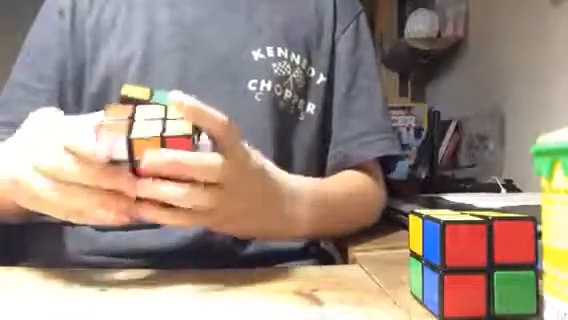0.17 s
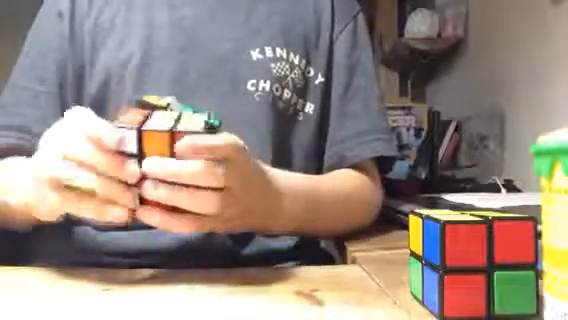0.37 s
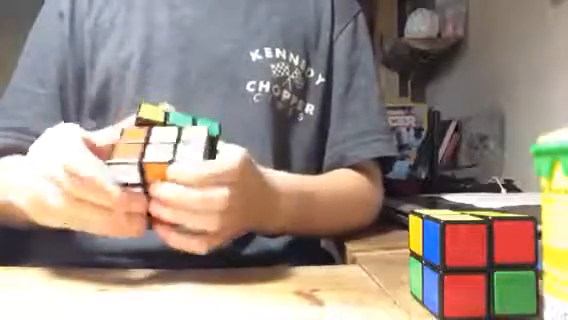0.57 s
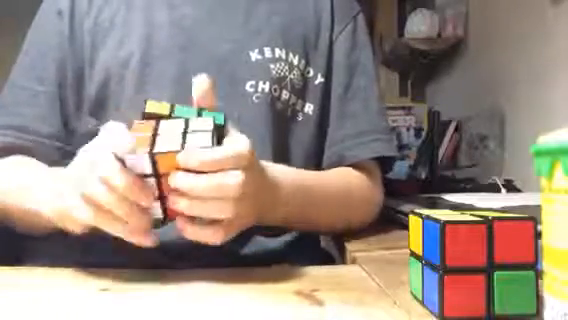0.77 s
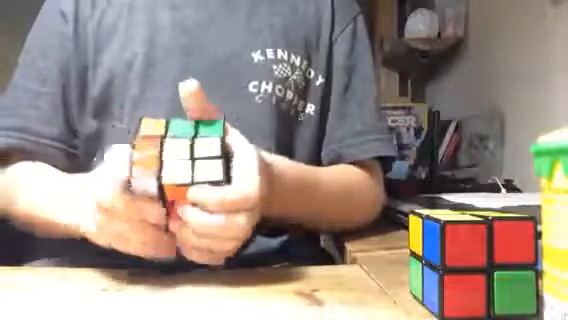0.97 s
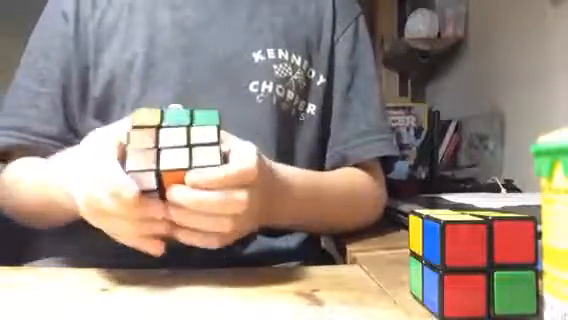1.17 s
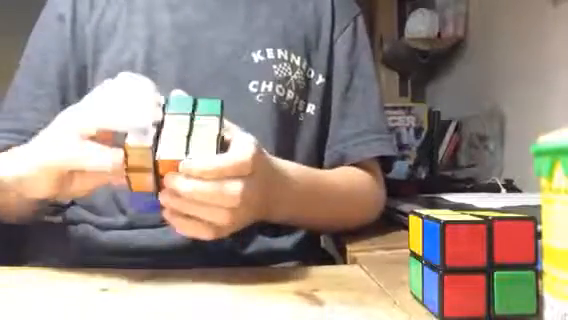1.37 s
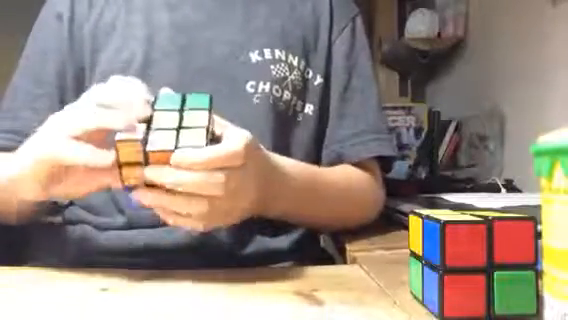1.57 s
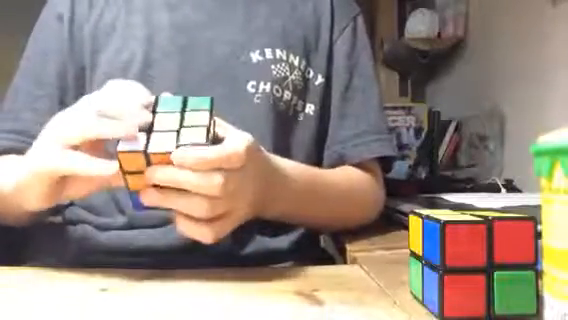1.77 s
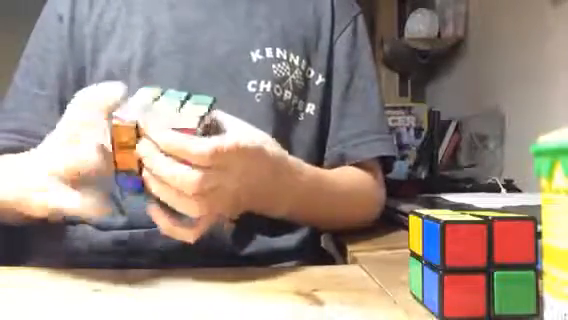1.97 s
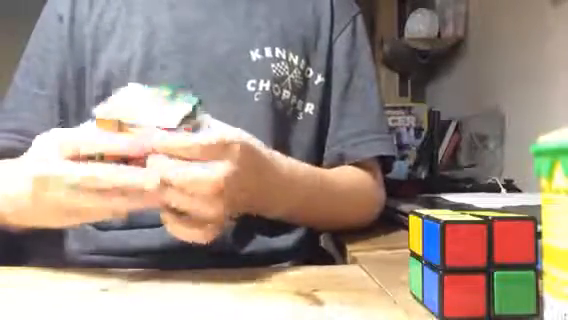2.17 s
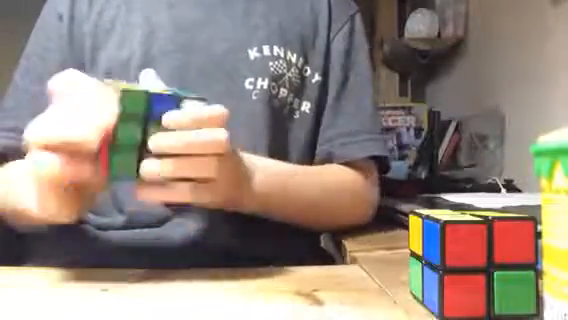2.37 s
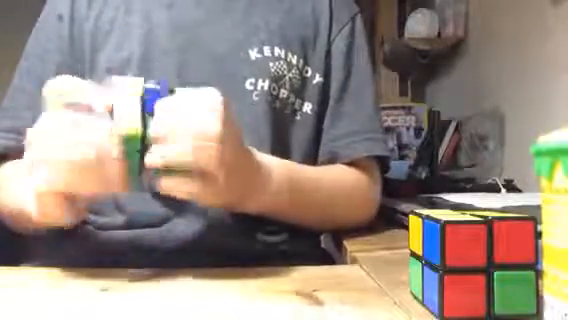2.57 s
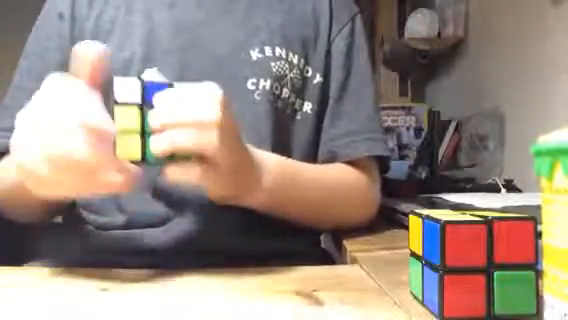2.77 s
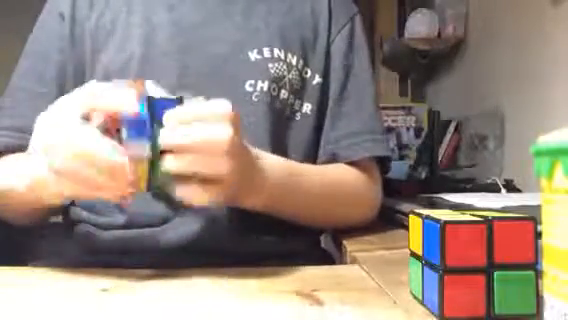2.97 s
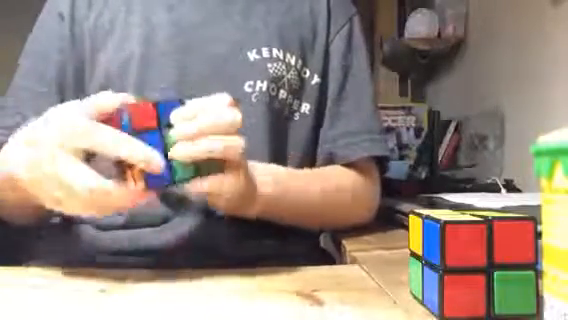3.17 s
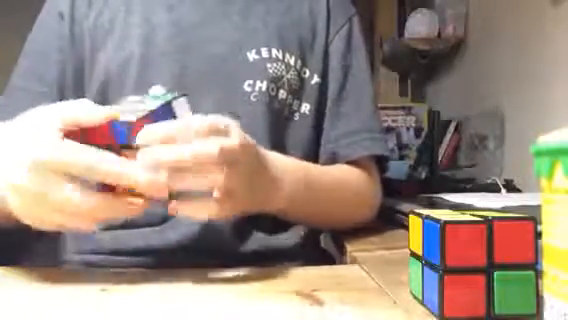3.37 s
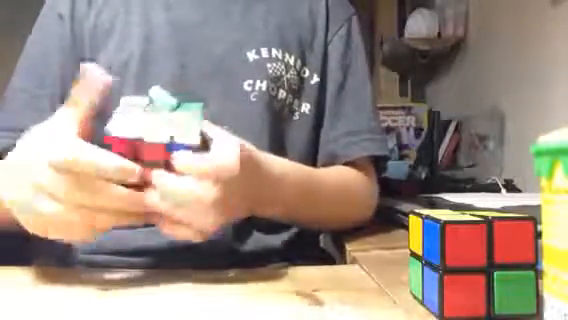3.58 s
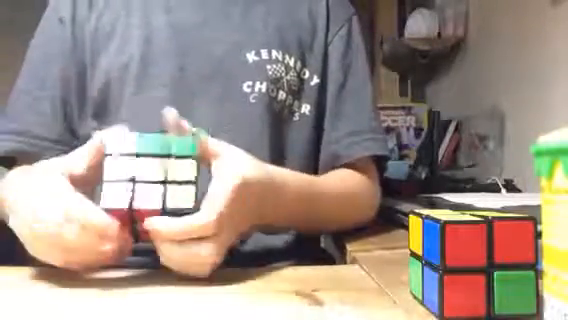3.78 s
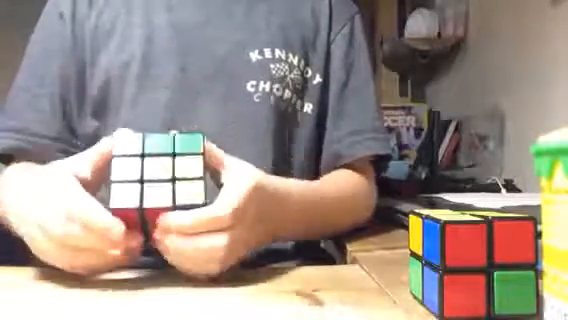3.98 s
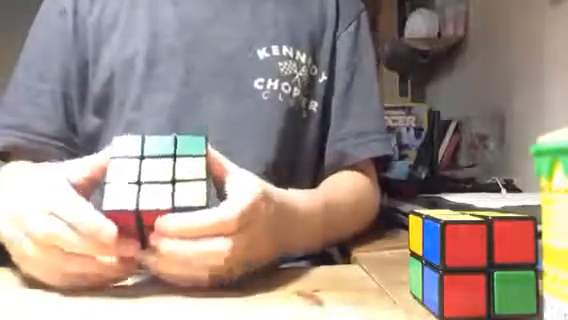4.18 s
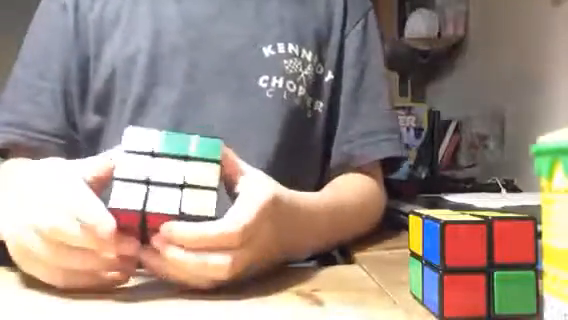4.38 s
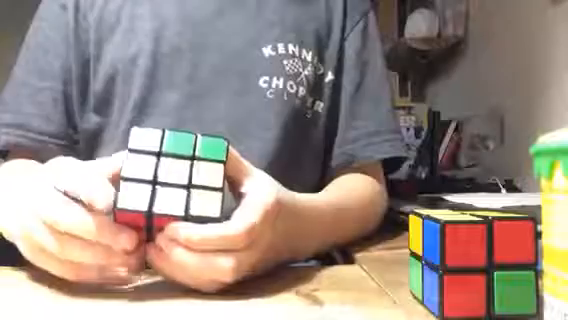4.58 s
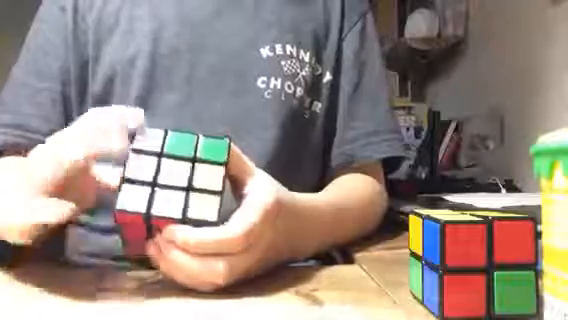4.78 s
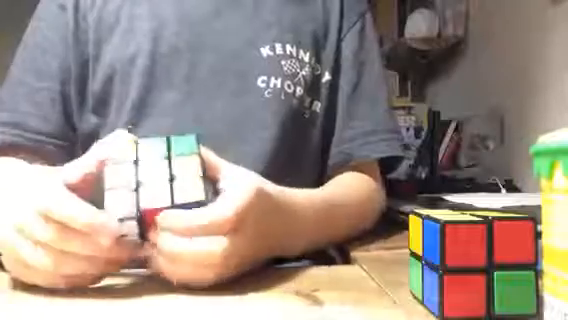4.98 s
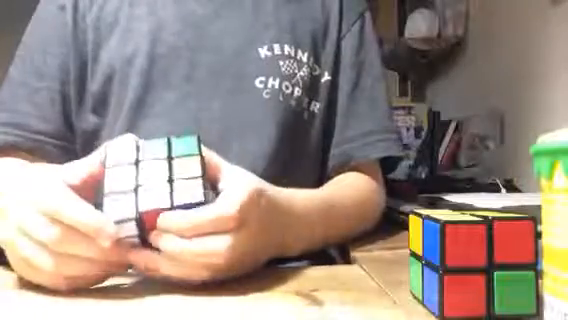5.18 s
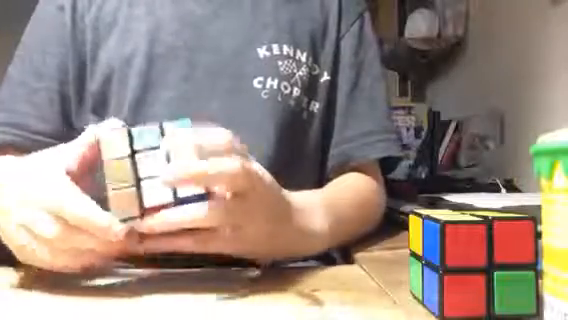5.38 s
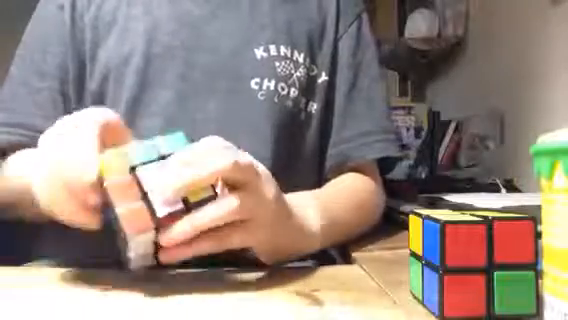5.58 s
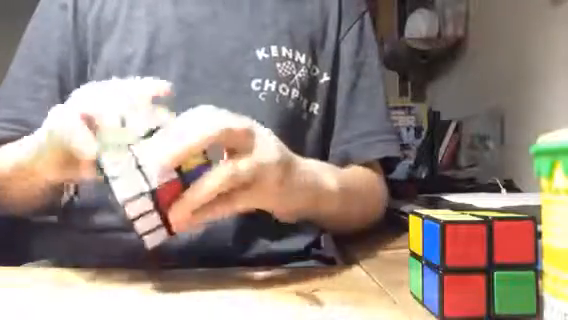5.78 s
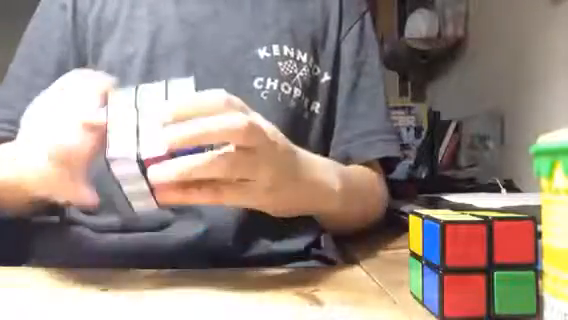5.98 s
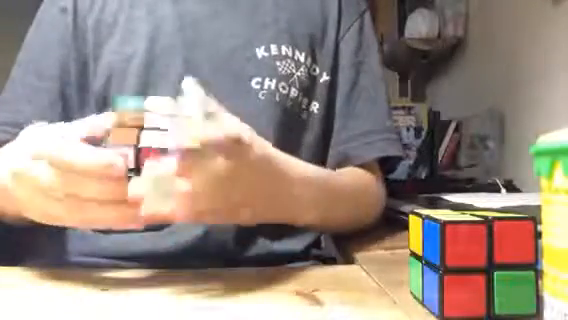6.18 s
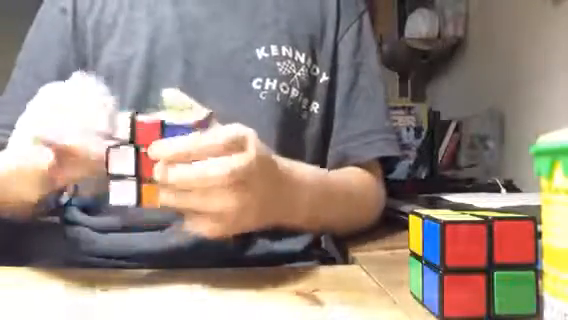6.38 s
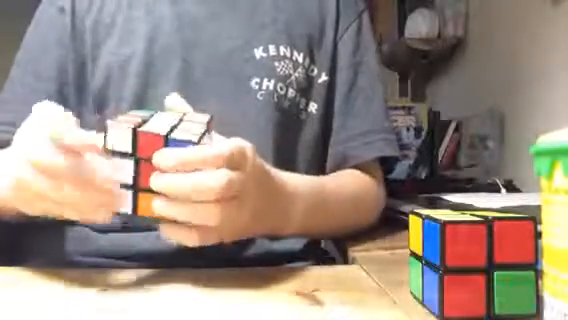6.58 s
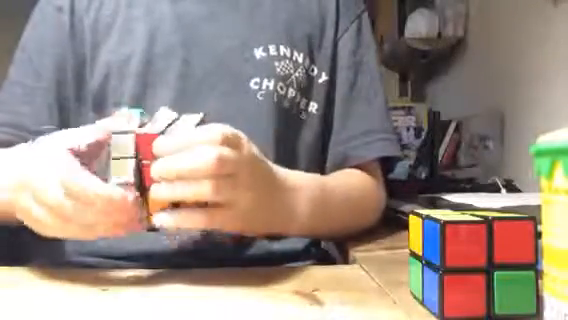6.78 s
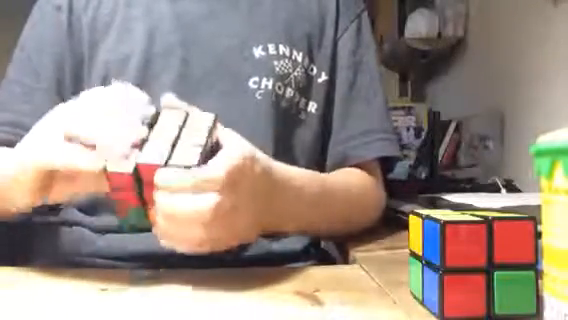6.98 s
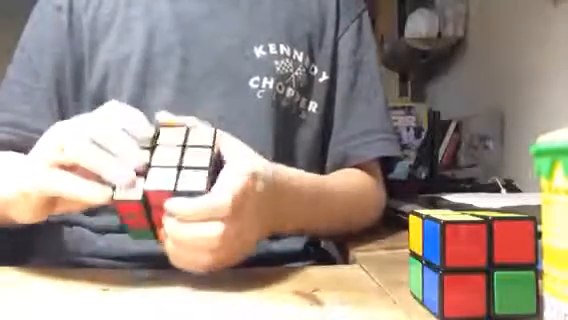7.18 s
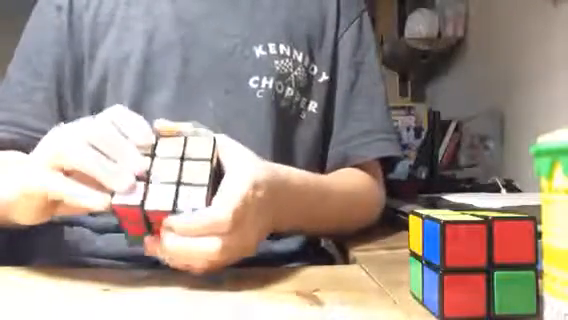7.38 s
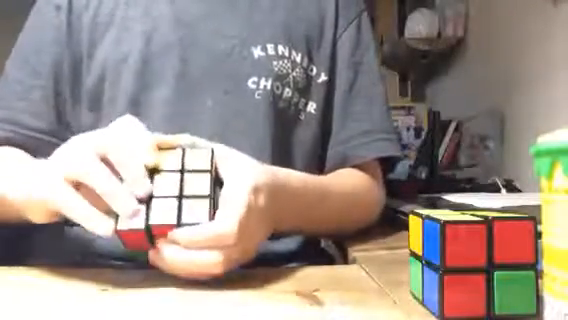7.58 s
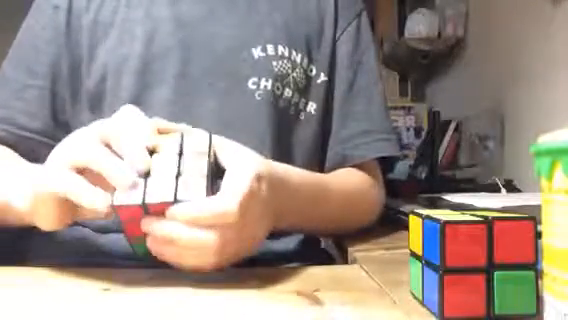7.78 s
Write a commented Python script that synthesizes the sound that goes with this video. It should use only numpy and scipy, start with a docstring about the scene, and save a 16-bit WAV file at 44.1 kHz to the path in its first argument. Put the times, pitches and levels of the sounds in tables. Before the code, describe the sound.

Close, dry, short plastic clacks with bright ticking edges and tiny rattles, made by layers of a twisted puzzle cube catching and snapping home. They arrive in irregular tight bursts with gaps between, including one long quiet hold in the middle with barely audible finger touches. The last stretch is denser, then eases to soft clicks. A small room adds slight reflections over soft rumble and hiss.

```python
"""A plastic puzzle cube is twisted in the hands, close to a phone microphone.
Each time the pieces catch or snap home they knock: short dying tones ring low for the hollow cube
and higher for the pieces, and bright pings and noise bursts tick for the edges. Tiny random contacts
chatter around each knock. Faces rustle in grains of noise and fingertips make short noise puffs.
A quiet room adds reflections, with steady rumble, hiss, hum and a faint whine behind."""
import sys
import numpy as np
from scipy import signal
from scipy.fft import rfft, irfft, next_fast_len
from scipy.io import wavfile
from scipy.ndimage import uniform_filter1d

SR = 44100
rng = np.random.default_rng(int(sys.argv[2]) if len(sys.argv) > 2 else 0)


def waveform_to_disk(signal):
    """Save audio, clipped to [-1, 1], as 16-bit WAV at the path in sys.argv[1]."""
    frames = np.transpose(np.atleast_2d(signal))
    scaled = np.clip(frames, -1, 1) * 32767
    samples = np.round(scaled).astype(np.int16)
    wavfile.write(sys.argv[1], SR, samples)


N = 346185  # length of the scene in samples

# Moments when the pieces catch or snap home: (time [s], cube ring level [dB], favoured cube pitch [Hz],
# piece ring over cube [dB], favoured piece pitch [Hz], tick over cube [dB])
KNOCKS = [(0.0547, -42.5, 1324, -14.5, 2710, -18), (0.146, -57, 1150, -7, 3030, -7),
          (0.187, -52, 1000, -4.5, 3040, -4), (0.24, -63.5, 1550.0, -2, 2400.0, 3.0),
          (0.274, -64.5, 1500, 4, 2820, 1), (0.435, -37, 1286, -11, 3050, -8.5),
          (0.6155, -54.5, 1200.0, -7, 3500, -13.5), (0.662, -29, 1300, -13.0, 2720.0, -16),
          (0.6856, -50, 1060.0, -15, 2490.0, -7), (0.7568, -47.5, 970, -11, 3440, -17.0),
          (0.7755, -44.5, 1880, -1.5, 3400.0, -11), (0.8664, -35.5, 1200.0, -0.5, 3460, -11.5),
          (0.8915, -43.5, 1010, -18.0, 3410.0, -20.5), (0.9166, -55, 1570.0, -3, 2700, -7.0),
          (0.9738, -36.5, 1275, -10.5, 2430, -16.5), (1.137, -36, 1200.0, -22.0, 3420.0, -22),
          (1.1551, -37, 1510, -8.5, 2570, -17.5), (1.4134, -40.5, 1000, -8, 3400.0, -25.5),
          (1.419, -25.5, 1200.0, -19, 2520.0, -26), (1.4282, -25.5, 1590.0, -0.5, 2520, -6),
          (1.434, -28.5, 1140, -14, 2470.0, -18), (1.4469, -17, 1210, -7.5, 3030, -10),
          (1.454, -24, 1093, -6, 3450, -3.5), (1.4604, -23, 1000, -4, 2760, -16),
          (1.4618, -18.5, 941, -9.5, 3320, -6), (1.4669, -26.0, 980.0, -6, 3560, -5),
          (1.479, -21.5, 1200.0, -10.0, 4300, -26), (1.4953, -35.5, 1020, -9, 3300, -15),
          (1.75, -45.5, 938, -9.5, 2530, -9), (1.7578, -41, 1216, -22, 2970, -15),
          (2.102, -41, 1550, -6, 3360, -5.5), (2.2842, -48.5, 1350, 2.5, 2720.0, -6),
          (2.3206, -48, 1580.0, -9, 3030, -9), (2.674, -32.5, 1010, -5.5, 2820, -8.0),
          (2.6805, -28.5, 1180, -3.5, 3530, -15), (2.6885, -14.5, 1350, -12, 2363, -18),
          (2.7059, -17, 1230, -11, 3330, -16.5), (2.7209, -20, 1028, -10, 2720.0, -12),
          (2.734, -28.5, 1625, -5, 3330, -6.5), (2.7454, -31.5, 1580.0, -4, 3500, -14),
          (3.04, -59, 1500, -7, 3400, -17), (3.0554, -34.0, 1273, -8, 3400.0, -10.5),
          (3.067, -26, 1550, -1, 3410, -16), (3.0744, -44, 1070.0, 4, 2990, -15),
          (3.0828, -24.5, 1280, -7.5, 3220, -20), (3.094, -31, 1270.0, -5, 2720.0, -19),
          (3.1016, -28.5, 1030, -7.5, 2880, -16), (3.118, -28, 1110, -15.5, 3220, -22),
          (3.1241, -38.5, 1096, -7, 2970, -8.0), (3.1432, -34.0, 1360.0, -13, 2280, -17),
          (3.177, -33.5, 1580.0, -7, 3450, -16), (3.189, -47, 1300, -4, 3300, -10),
          (3.2206, -40, 1630, -4, 3300, -11.5), (3.334, -61.5, 1590.0, -7, 2850.0, -7),
          (4.9714, -29.5, 1300, -6, 2950, -4.5), (4.975, -24.5, 1020, -6.5, 2820.0, -1.5),
          (4.9873, -16.5, 1270, -5, 2780, -12.5), (5.0013, -14, 1220, -8, 2945, -17),
          (5.0176, -20.0, 1095, -12, 2380.0, -15), (5.0218, -24, 1120, -9, 2750, -11),
          (5.0285, -25, 1155, -10, 3410.0, -17.5), (5.046, -29.5, 1230, -10, 3120.0, -20),
          (5.048, -32, 1230, -9, 3100, -22), (5.0648, -28, 1010, -5, 2650.0, -21),
          (5.0694, -29.5, 1200, -9, 2704, -20), (5.0879, -44, 1040, -15, 2700, -24.5),
          (5.336, -60, 960.0, -2.0, 2480.0, -6), (5.5545, -39.5, 1010, -13, 3130, -32),
          (5.5627, -35, 1200.0, -6.0, 2990.0, -23), (5.6804, -38.5, 980, -7.5, 3400, -27.5),
          (5.7233, -30, 1230.0, -10.5, 3030, -15.0), (5.7369, -33.5, 1550.0, -5.5, 2670.0, -16),
          (5.755, -40, 1010, -12, 3100, -17), (5.7665, -20.5, 1184, -9.5, 2720.0, -22),
          (5.7776, -28, 1220.0, -12, 2800, -15.0), (5.785, -23, 1230, -8, 3550, -12),
          (5.797, -25.5, 960, -12, 2600, -19), (5.8094, -23.5, 1183, -12.5, 2490, -19),
          (5.884, -45.5, 1170, -11.5, 2450, -15), (5.8935, -45, 1160, -11, 2680.0, -10),
          (5.91, -48, 1330, -8.0, 2840, -14), (6.212, -57.5, 1160.0, -3.5, 2500, -9.0),
          (6.405, -34.5, 1560.0, -7, 2700.0, -22), (6.4209, -12.5, 1307, -6.5, 3080, -9.5),
          (6.469, -44, 1450, 4, 3370, 9.5), (6.4974, -44.5, 1220, -15, 3200.0, -19),
          (6.5321, -26, 1280, -2.0, 2715, -3), (6.5352, -25, 1240, -16, 3000, -3),
          (6.5401, -41, 1580, 2, 3150.0, -13), (6.608, -56, 970, -8, 2810.0, -11),
          (6.637, -56.0, 1340.0, -16, 2320, -13.0), (6.6611, -40, 1290, -7.5, 2650, -14),
          (6.734, -29.5, 1200.0, -2, 2720.0, -12.5), (6.7803, -25, 1220.0, -12.5, 3400, -16.5),
          (6.7956, -30, 1400, -11.0, 2620.0, -18.0), (6.8047, -31.5, 1200.0, -2.5, 3060, -17),
          (6.8189, -24, 1180, -10.5, 3390.0, -13.5), (6.8247, -26.5, 1440, -8.0, 2720, -12),
          (6.8555, -33.5, 975, -5, 3400, -12), (6.942, -47.5, 1220.0, -13, 3980.0, -21.0),
          (6.951, -23.5, 1154, -11, 2500, -24), (6.964, -24, 1210, -6, 2600, -9.5),
          (6.9716, -24.5, 1000.0, -8, 2420, -12), (6.9795, -36, 1050, -4, 2450, -20),
          (6.988, -17.5, 1356, -8, 3380, -26), (6.9917, -11.5, 1248, -8, 3065, -8.5),
          (7.0075, -19.5, 1270, -10.5, 3630, -15), (7.0167, -30.5, 1080, -8.0, 2430, -12.5),
          (7.0323, -30, 1270, -1.5, 2780, -8.5), (7.0506, -39, 1090, -10.5, 2750.0, -13),
          (7.36, -38, 1970, -5, 3370, -8.5), (7.3802, -48, 990.0, -2.5, 2510.0, -13.5),
          (7.5537, -42.5, 1262, -9.5, 2500, -25.5), (7.573, -53, 984, 1.5, 2660, -5.5),
          (7.7698, -52, 1200.0, -3.5, 2280, -4)]
# Tones of the hollow cube, before the palms damp them: (pitch [Hz], level [dB], time to fall 60 dB [s])
CUBE_MODES = [(876, -16, 0.04), (1000, -6, 0.033), (1200, -1.5, 0.022), (1351, -3, 0.019),
              (1580, -6.5, 0.027), (1956, -8.5, 0.032)]
# Tones of the pieces, before the palms damp them: (pitch [Hz], level [dB], time to fall 60 dB [s])
PIECE_MODES = [(2235, -11.5, 0.041), (2510, -2.5, 0.018), (2720, -4, 0.033), (3038, -4.5, 0.058),
               (3400, -2.5, 0.03), (4072, -7, .02), (4700, -6.5, 0.017)]
CUBE_FOCUS_DB, PIECE_FOCUS_DB = 17, 16  # how strongly a knock favours one mode
MODE_SCATTER_DB = 2.5  # chance strength of the other modes
BLOW_T60_S, BLOW_SPREAD = 0.015, 0.3  # the palms damp each blow; largest change as a natural-log factor
TICK_LOW_HZ, TICK_HIGH_HZ = 8500, 11950  # range of the ping's pitch, drawn at random for each knock


def cube():
    """Every knock drives the hollow cube, the pieces and their edges at once."""
    s, cube_db, cube_hz, piece_over_db, piece_hz, tick_over_db = np.transpose(KNOCKS)
    piece_db = cube_db + piece_over_db
    ping_draw, grip = rng.random((len(s), 2)).T
    ping_hz = TICK_LOW_HZ * (TICK_HIGH_HZ / TICK_LOW_HZ) ** ping_draw
    blow_t60 = BLOW_T60_S * np.exp(BLOW_SPREAD * (2 * grip - 1))

    cube_ring = ring(CUBE_MODES, cube_hz, CUBE_FOCUS_DB, rise_s=0.00096, scatter_db=MODE_SCATTER_DB,
                     detune=0.037, blow_t60=blow_t60, linger_db=-11.5)
    piece_ring = ring(PIECE_MODES, piece_hz, PIECE_FOCUS_DB, rise_s=0.0005, scatter_db=MODE_SCATTER_DB,
                      detune=0.047, blow_t60=blow_t60, linger_db=-9.5)
    rings = gain_of(cube_db)[:, None] * cube_ring + gain_of(piece_db)[:, None] * piece_ring

    cube_contacts = chatter(s, cube_db - 15, per_s=2500, t60=0.065, spread_db=2.0)
    cube_rattle = rattled(cube_contacts, CUBE_MODES, count=12)
    piece_contacts = chatter(s, piece_db - 12, per_s=2000, t60=0.048, spread_db=2.5)
    piece_rattle = rattled(piece_contacts, PIECE_MODES, count=12)

    knocks = placed(s, rings) + cube_rattle + piece_rattle + ticks(s, cube_db + tick_over_db, ping_hz)
    # The cube is too small to radiate bass.
    knocks = signal.sosfilt(signal.butter(3, 760, "high", fs=SR, output="sos"), knocks)
    # The jolts shake the palms, a dull thud.
    jolts = chatter(s, cube_db - 10.5, per_s=2500, t60=0.093, spread_db=4.3)
    thud = signal.sosfilt(signal.butter(2, [260, 560], "band", fs=SR, output="sos"), jolts)
    return knocks + thud


def ring(modes, favoured_hz, focus_db, rise_s, scatter_db, detune, blow_t60, linger_db):
    """One row a knock, peak 1: dying tones, weaker away from the favoured one, which the grip retunes."""
    hz, db, t60 = np.transpose(modes)[:, None, :, None]
    octaves = np.log2(favoured_hz[:, None, None] / hz)
    nearest_index = abs(octaves).argmin(axis=1)[:, None]
    nearest = np.take_along_axis(octaves, nearest_index, 1)
    size, shift, phase = rng.standard_normal((len(favoured_hz), len(modes), 3, 1)).transpose(2, 0, 1, 3)
    away = abs(octaves - nearest)  # octaves from the favoured mode
    other = away > 0
    t = np.arange(1280) / SR

    focus_loss_db = np.minimum(focus_db * away ** 0.5, 30)
    level_db = db + scatter_db * size * other - focus_loss_db - 60 * t / t60
    pitch = hz * 2 ** (nearest + detune * shift * other)
    rows = (gain_of(level_db) * np.sin(2 * np.pi * pitch * t + 0.5 * phase)).sum(axis=1)
    # A quickly damped blow over a weaker part that lingers.
    damping = gain_of(-60 * t / blow_t60[:, None]) + gain_of(linger_db)
    rows *= (1 - np.exp(-t / rise_s)) ** 2 * damping
    return rows / abs(signal.hilbert(rows)).max(axis=1)[:, None]


def chatter(s, db, per_s, t60, spread_db):
    """Sparse small contacts that swell just before each knock, then rebounds that die away."""
    t = np.arange(-384, 3072) / SR
    when, size, sign = rng.random((len(s), len(t), 3)).transpose(2, 0, 1)
    lead_in = gain_of(-15 + 60 * np.minimum(t, 0) / 0.028)
    rebounds = gain_of(-60 * t / t60) * np.clip(t / 0.0046, 0, 1)
    shape = np.where(t < 0, lead_in, rebounds)
    sizes = gain_of(db[:, None] - spread_db * np.log(size + 0.042)) * shape  # few large, many small
    contacts = (when < per_s / SR) * np.sign(sign - 0.5) * sizes
    return placed(s + t[0], contacts)


def rattled(train, modes, count):
    """Each small contact strikes one of several spots, each with its own blend of the modes."""
    hz = np.exp(rng.uniform(np.log(modes[0][0]), np.log(modes[-1][0]), count))
    spots = ring(modes, hz, focus_db=9, rise_s=0.00034, scatter_db=2.7, detune=0.046,
                 blow_t60=np.full(count, 0.012), linger_db=-8.0)
    spot = rng.integers(0, count, N)
    return sum(signal.oaconvolve(train * (spot == k), spots[k])[:N] for k in range(count))


# Colour of the edges' bursts and crackle: (pitch [Hz], level [dB])
EDGE_COLOUR = [(2500, -39), (4200, -7), (5400, 1), (6800, -4.5), (9000, -1), (11000, -3), (12500, -9.5),
               (15200, -16)]


def ticks(s, db, hz):
    """Edges meet in a ping and a burst of a few milliseconds, with a fine crackle."""
    t = np.arange(512) / SR
    rise = gain_of(db[:, None]) * (1 - np.exp(-t / 0.00041)) ** 2
    pings = rise * gain_of(2.5 - 60 * t / 0.0048) * np.sin(2 * np.pi * hz[:, None] * t)
    bursts = rise * gain_of(4.0 - 60 * t / 0.01) * rng.standard_normal((len(s), len(t)))
    crackle = chatter(s, db - 7, per_s=10000, t60=0.067, spread_db=6.0)
    return placed(s, pings) + coloured(placed(s, bursts) + crackle, EDGE_COLOUR)


# Fingertips lifting off or brushing an edge, with no knock; level is before the rise and decay:
# (time [s], level [dB], centre pitch [Hz], spread [octaves])
TOUCHES = [(2.7803, -55, 8800, 0.73), (3.565, -66.5, 4500, .1), (3.726, -61.5, 9600, 0.73),
           (3.873, -61.5, 4170, 0.43), (3.964, -65, 5000, 2), (3.967, -59, 800, .4),
           (4.0708, -55, 6400, 1.1), (4.17, -71, 10500, .2), (4.246, -54, 5840, 0.92),
           (4.276, -66, 11500, .25), (4.297, -66, 4500, .4), (5.165, -69, 10600, .15),
           (5.191, -57, 12500, 0.97), (5.546, -61.5, 3500, .4)]
TOUCH_RISE_S, TOUCH_T60_S = 0.0014, 0.027


def touches():
    """Short dry puffs of noise while the hands shift their hold, each in its own band."""
    s, db, hz, spread = np.transpose(TOUCHES)[:, :, None]
    t = np.arange(1024) / SR
    f = np.fft.rfftfreq(1024, 1 / SR) + 1  # the 1 avoids the logarithm of zero
    band = np.exp(-(np.log2(f / hz) / spread) ** 2)
    noise = irfft(rfft(rng.standard_normal((len(s), len(t)))) * band)
    noise /= noise.std(axis=1)[:, None]
    envelope = gain_of(db - 60 * t / TOUCH_T60_S) * (1 - np.exp(-t / TOUCH_RISE_S))
    return placed(s[:, 0], envelope * noise)


# Faces sliding under the fingers; level is what the swell climbs to, before the fades at both ends:
# (start time [s], length [s], level [dB])
SLIDES = [(.85, 0.19, -75), (3.14, .08, -68), (4.0, .4, -80), (4.88, 0.19, -76), (5.84, 0.14, -75.5),
          (6.384, 0.062, -68.5), (6.911, .07, -80)]
# Colour of the rustle: (pitch [Hz], level [dB])
SLIDE_COLOUR = [(500, -20.5), (1200, -7), (3000, -1.5), (6000, -14.5), (10000, 5.5), (15000, -18.5)]
SLIDE_SWELL_DB = 10.5  # a stroke swells by this much as it gathers speed


def slide():
    """Fine grains of friction, smooth plastic on plastic and skin."""
    grain_size = gain_of(2.6 * np.minimum(rng.exponential(1, N), 4))
    grains = grain_size * rng.standard_normal(N) * (rng.random(N) < 6000 / SR)  # about 6000 a second
    level = np.zeros(N)
    for start, length, db in SLIDES:
        at = np.arange(round(start * SR), round((start + length) * SR))
        swell = gain_of(db + SLIDE_SWELL_DB * np.linspace(-1, 0, len(at)))
        level[at] = swell * signal.windows.tukey(len(at), 0.5)
    return level * evened(coloured(grains, SLIDE_COLOUR))


# How fast the room's reflections die: (pitch [Hz], time to fall 60 dB [s])
ROOM_DECAY = [(700, 0.18), (1800, .16), (4800, 0.23), (13000, 0.12)]


def room(x):
    """Sparse reflections of random sign, each band dying at its own speed."""
    taps = np.zeros(SR // 2)
    at = np.arange(200, len(taps) - 20, 20)
    at_random = at + rng.integers(0, 20, len(at))
    taps[at_random] = rng.choice([-1., 1.], len(at))
    hz, t, z = signal.stft(taps, SR, nperseg=128)
    decay = gain_of(-60 * t / read(ROOM_DECAY, hz)[:, None])
    tail = signal.istft(z * decay, SR, nperseg=128)[1]
    return signal.fftconvolve(x, tail / np.linalg.norm(tail))[:N]


# Colour of the room's rumble and hiss, relative: (pitch [Hz], level [dB per Hz])
AIR_COLOUR = [(25, -21), (48, -9), (170, -7), (360, -15.5), (400, -18.5), (480, -15.5), (700, -20.5),
              (1380, -27.5), (3000, -36), (9300, -42.5), (13000, -43), (15500, -50.5)]
AIR_DB = -63  # rms level


def air():
    """Steady rumble and hiss: coloured noise with slight drifting patches."""
    frames, hz = N // 512 + 5, np.fft.rfftfreq(2048, 1 / SR)
    a, b, patches = rng.standard_normal((frames, 1025, 3)).T
    patches = evened(uniform_filter1d(uniform_filter1d(patches, 14, 0), 10, 1))
    z = (a + 1j * b) * gain_of(read(AIR_COLOUR, hz)[:, None] + 0.57 * patches)
    noise = signal.istft(z, nperseg=2048, noverlap=1536)[1][:N]
    return gain_of(AIR_DB) * evened(noise)


# Fuzzy tones of distant appliances: (pitch [Hz], width [Hz], rms level [dB])
HUM_TONES = [(59, 17, -65), (100.6, 5.6, -75), (117.3, 7.1, -71), (160.3, 9, -70), (701, 64, -79)]
WHINE_HZ, WHINE_DB = 9001, -97  # faint steady tone of electronics, rms level


def hum():
    """Distant appliances hum as noise in narrow resonances; electronics whine as a pure tone."""
    hz, noise = np.fft.rfftfreq(N, 1 / SR), rfft(rng.standard_normal(N))
    tones = np.zeros(N)
    for f, width, db in HUM_TONES:
        resonance = 1 / (1 + (2 * (hz - f) / width) ** 2)
        tones += gain_of(db) * evened(irfft(noise * resonance, N))
    whine = np.sqrt(2) * np.sin(2 * np.pi * WHINE_HZ * np.arange(N) / SR)
    return tones + gain_of(WHINE_DB) * whine


def gain_of(db):
    """Turns decibels into a gain."""
    return 10 ** (np.asarray(db) / 20)


def evened(x):
    """Scales to rms 1."""
    return x / np.sqrt(np.mean(x ** 2) + 1e-20)


def read(points, hz):
    """Reads a table between its points, over log frequency."""
    f, value = np.transpose(points)
    return np.interp(np.log(hz + 1), np.log(f + 1), value)


def coloured(x, points):
    """Filters by a table of (pitch [Hz], level [dB])."""
    size = next_fast_len(len(x))
    gain = gain_of(read(points, np.fft.rfftfreq(size, 1 / SR)))
    return irfft(rfft(x, size) * gain, size)[:len(x)]


def placed(s, rows):
    """Mixes each row in at its time in seconds."""
    out = np.zeros(N + rows.shape[1])
    start = np.round(s * SR).astype(int)[:, None]
    np.add.at(out, start + np.arange(rows.shape[1]), rows)
    return out[:N]


def scene():
    """The cube and hands, their reflections in the room, and the background."""
    near = cube() + touches() + slide()
    reflections = gain_of(-18.5) * room(near)
    return (near + reflections + air() + hum())[None]


EDGE_HZ = 15350  # upper band limit of the recorder


def record(dry):
    """The microphone drops the deepest bass; then the recorder limits the band."""
    thin = signal.sosfilt(signal.butter(3, 42, "high", fs=SR, output="sos"), dry)
    band_limit = signal.firwin(511, EDGE_HZ, window=("kaiser", 9), fs=SR)
    return signal.oaconvolve(thin, band_limit[None], "same")


dry = scene()
out = record(dry)
waveform_to_disk(out)
```